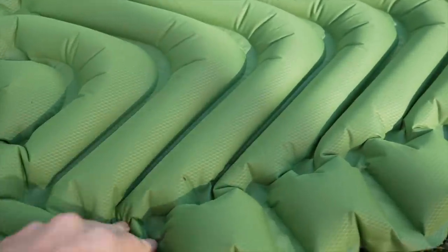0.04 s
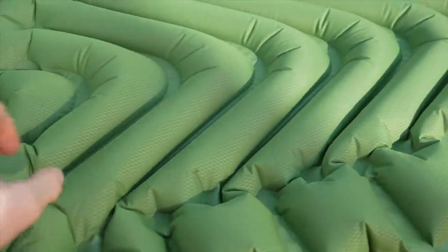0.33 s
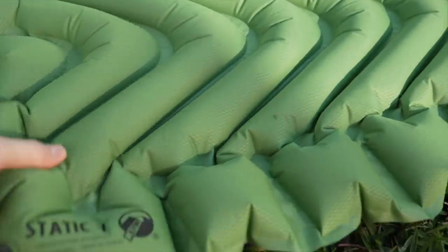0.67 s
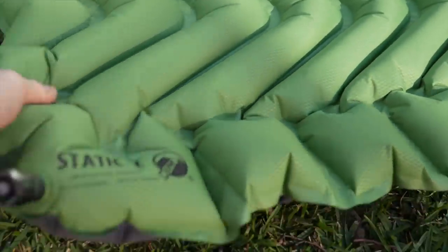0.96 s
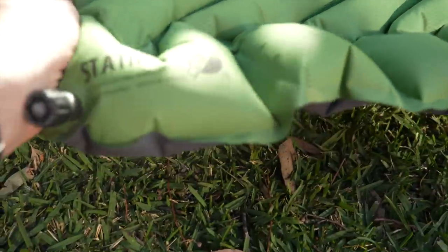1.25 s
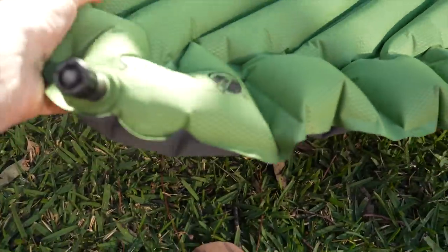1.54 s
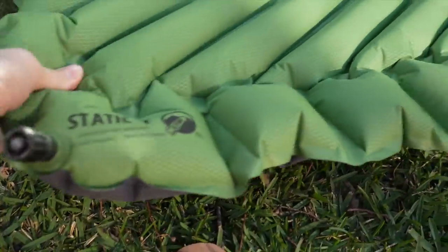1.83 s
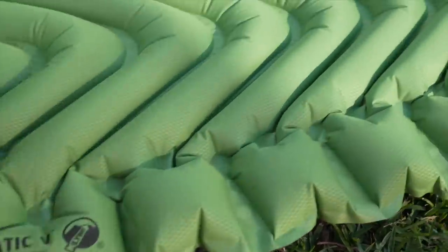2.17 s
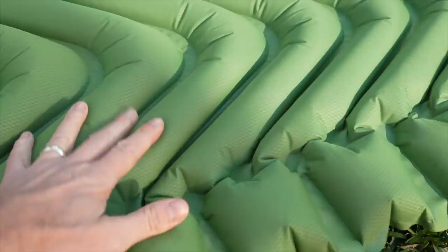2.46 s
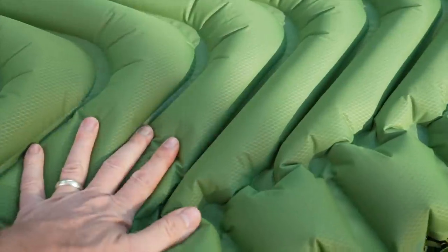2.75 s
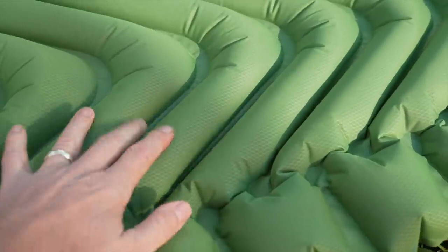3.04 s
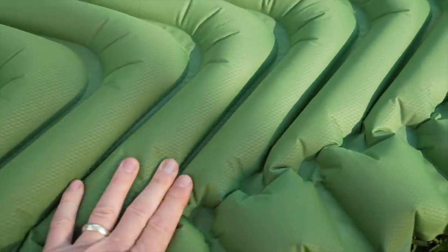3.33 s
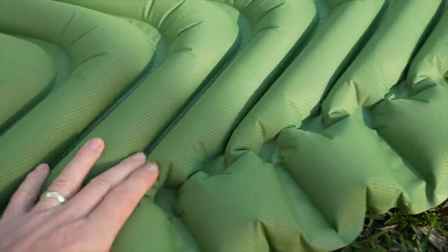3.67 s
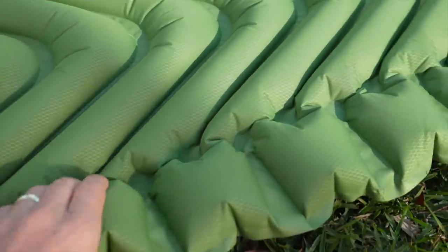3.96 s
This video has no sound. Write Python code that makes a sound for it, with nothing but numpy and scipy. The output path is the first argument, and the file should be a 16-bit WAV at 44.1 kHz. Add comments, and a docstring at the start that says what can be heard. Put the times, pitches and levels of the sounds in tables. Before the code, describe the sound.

A hand rubs an inflated fabric pad close by, making an uneven, slightly hollow rasp with crackles. Creases snap in clusters around 0.2 and 0.8 seconds, and most sharply from 1.1 to 1.5. Louder rubbing swishes come at about 2.1 and 2.5 seconds, the strongest at 3.3. Scattered clicks and a few soft thumps continue until about 4 seconds, with a faint, steady outdoor rumble throughout.

```python
"""Skin rasps and creases crackle close by, as a hand handles an inflated fabric sleeping pad on a lawn:
it grips the pad, lifts a corner, lays it back, then strokes and presses it.
The rasp is thousands of tiny slips over the taut weave; each snap is a patch of fabric buckling.
The air chambers answer with a short hollow ring and soft thumps, over a faint outdoor rumble."""
import sys
import numpy as np
from scipy import signal
from scipy.fft import rfft, irfft
from scipy.io import wavfile

SR = 44100
rng = np.random.default_rng(int(sys.argv[2]) if len(sys.argv) > 2 else 0)


def store_pcm(level_fs):
    """Save levels as 16-bit WAV."""
    pcm = np.round(np.clip(level_fs, -1, 1) * 32767).astype(np.int16)
    wavfile.write(sys.argv[1], SR, np.atleast_2d(pcm).T)


N = 176400
TIME = np.arange(N) / SR


def rubbing(body_db, rasp_db):
    """Sliding skin excites the hollow chambers, the taut fabric and the weave; the uneven grip judders."""
    # Tone of the hollow chambers: (frequency [Hz], relative level [dB])
    body_tone = [(60, -1), (150, -10.5), (260, -6.5), (370, 0), (480, -5.5), (700, -3), (850, -7.5),
                 (1350, -12.5), (2000, -43)]
    # Tone of the taut fabric's rasp: (frequency [Hz], relative level [dB])
    rasp_tone = [(700, -6.5), (1350, 0.5), (2200, -3.5), (3800, -8), (7000, -25)]
    # Tone of the weave's hiss: (frequency [Hz], relative level [dB])
    hiss_tone = [(3000, -24), (5400, -1), (10500, -9), (16000, -14)]
    # Level ride of the hiss against the rasp: (time [s], level [dB])
    sheen = [(0.62, -6), (1.2, -3.5), (2.12, -4), (2.25, -18), (2.4, -7.5), (3.5, -5), (3.8, 1.5),
             (4.0, -4.5)]
    hiss_db = rasp_db + np.interp(TIME, *np.transpose(sheen))
    judder_db = 2 * drift(rate_hz=29)
    layers = (body_tone, body_db), (rasp_tone, rasp_db), (hiss_tone, hiss_db)
    return sum(from_db(db + judder_db) * colour(slips(), tone) for tone, db in layers)


def slips(per_s=8000, spread_db=4.5, smooth_share=0.41):
    """Skin catches and slips on threads: dense grains of uneven size over a smooth hiss."""
    sizes = from_db(spread_db * np.minimum(rng.exponential(1, N), 5)) * rng.choice([-1, 1], N)
    grains = rms_one(sizes * (rng.random(N) < per_s / SR))
    return np.sqrt(1 - smooth_share) * grains + np.sqrt(smooth_share) * rng.standard_normal(N)


def snaps(neighbour_spread_s=0.005, neighbour_db=-14.5):
    """Large creases snap through; each drags two tiny neighbouring folds along, just before or after."""
    # Snap cues: (time [s], strength [dB], pitch of the buckling patch [Hz], crack strength [dB])
    cues = [(0.1522, 12.5, 2630, 2.5), (0.1876, 13, 3450, -5), (0.1957, 14.5, 1740, 3),
            (0.2187, 10, 1500, -5), (0.2298, 12, 1390, -8), (0.2438, 12.5, 1750, 8.5),
            (0.2545, 7, 1690, -13), (0.2803, 8.5, 2060, -17), (0.3177, 17.5, 1440, 4),
            (0.3356, 18, 603, -21), (0.7299, 11.5, 2580, 8), (0.762, 6, 3320, -2), (0.7775, 17, 1700, 6),
            (0.789, 12, 1990, 8.5), (0.8199, 15.5, 3360, 5.5), (0.8226, 5, 3020, 0), (1.012, 8, 1820, -10),
            (1.069, 14.5, 1600, 0), (1.1501, 23, 830, 16.5), (1.1941, 14, 2630, 1), (1.198, 18.5, 585, -3),
            (1.2354, 22.5, 330, -15), (1.2378, 21, 740, -19), (1.2898, 10.5, 1610, -23),
            (1.3808, 23.5, 670, -7), (1.4087, 13, 2070, -18), (1.4222, 14, 920, 1),
            (1.4487, 17, 1510, 14.5), (1.4655, 11, 1400, 1), (1.4775, 12, 3320, -14), (1.4862, 13, 2650, 6),
            (1.4996, 17, 720, -22), (1.767, 7.5, 2200, -14), (1.8038, 13, 746, 5), (1.8105, 16, 2350, 2),
            (1.8266, 13, 3200, 3), (1.906, 12.5, 1560, -0.5), (1.9761, 13.5, 2880, -3),
            (2.0602, 11.5, 1100, -7), (2.083, 9, 2390, 0), (2.112, 15, 990, 7), (2.6068, 16.5, 1370, 1),
            (2.7084, 14, 1570, 5.5), (2.7377, 11.5, 2940, 1.5), (2.7966, 19, 445, 0.5),
            (2.8539, 6, 2200, -6), (2.9697, 16, 2020, 1), (3.0404, 16.5, 1300, 2.5),
            (3.4725, 8.5, 1310, 11.5), (3.4785, 16, 2350, -19), (3.6028, 13.5, 1830, 7),
            (3.6257, 16, 1190, -2), (3.6789, 17, 1820, 9.5), (3.6846, 18, 1630, -1), (3.8715, 20, 1000, 9),
            (3.9589, 1, 3720, -17)]
    out = np.zeros(N)
    for start, db, hz, crack_db in cues:
        add(out, start, crease(db, hz, crack_db))
        for lag in rng.normal(0, neighbour_spread_s, 2):
            fold_hz = hz * 2 ** rng.uniform(-0.47, 0.74)
            add(out, start + lag, crease(db + neighbour_db, fold_hz, crack_db + neighbour_db))
    return out


def crease(db, hz, crack_db):
    """A patch buckles and settles: a sharp crack, two or three cycles at its pitch, a chamber ring."""
    # Tone of the chamber's ring: (frequency [Hz], relative level [dB])
    ring_tone = [(100, -6), (280, 0.5), (600, -3), (8000, -39)]
    crossover_hz, crack_top_hz = 4250, 7400   # the crack takes over where the patch's sound ends
    mean_settle_s, crack_decay_s, ring_decay_s = 0.000911, 0.00061, 0.0054
    size = 2048
    clicks = np.zeros(size)
    clicks[0] = 1
    settle_at = 1 + int(mean_settle_s * SR * (.5 + rng.random()))
    clicks[settle_at] = from_db(-9) * rng.choice([-1, 1])
    resonance = poles(hz, q=1.71)
    band_pass = (1 - resonance[2]) / 2 * np.array([1, 0, -1])
    patch = from_db(db) * signal.lfilter(band_pass, resonance, clicks)
    patch = signal.lfilter(*signal.butter(2, crossover_hz, fs=SR), patch)
    burst = rng.standard_normal(size) * np.exp(-TIME[:size] / crack_decay_s)
    crack_band = signal.butter(1, [crossover_hz, crack_top_hz], "band", fs=SR)
    crack = from_db(crack_db) * signal.lfilter(*crack_band, burst / np.linalg.norm(burst))
    ring = rms_one(colour(rng.standard_normal(size), ring_tone) * np.exp(-TIME[:size] / ring_decay_s))
    return patch + crack + from_db(-3.5) * patch.std() * ring


def crackle(rasp_db, per_s=45, low_hz=640, high_hz=3300, spread_db=4.5):
    """Small creases give way at random, louder as the fabric works harder."""
    out = np.zeros(N)
    for i in np.flatnonzero(rng.random(N) < per_s / SR):
        hz = low_hz * (high_hz / low_hz) ** rng.random()
        db = 24 + 0.81 * rasp_db[i]   # follows most of the rasp's swing
        db += spread_db * min(rng.exponential(), 2)
        add(out, i / SR, crease(db, hz, crack_db=db - 14))
    return out


def thumps():
    """Bumped, pressed or tapped, the air cushion swells and wobbles for a few cycles."""
    # Thump cues: (time [s], envelope peak [dB], pitch [Hz], swell time [s])
    cues = [(0.717, -13.5, 680, 0.0014), (0.819, -23, 70, 0.0058), (0.895, -17.5, 51, 0.011),
            (1.233, -21.5, 147, 0.0026), (2.608, -9.5, 1370, 0.00089), (3.245, -15.5, 34, 0.018),
            (3.4324, -11, 620, 0.00098), (3.868, -20.5, 55, 0.0068)]
    out = np.zeros(N)
    t = TIME[:SR // 2]
    for start, db, hz, swell_s in cues:
        envelope = from_db(db) * t / swell_s * np.exp(1 - t / swell_s)
        add(out, start, envelope * np.sin(2 * np.pi * hz * t))
    return out


def outdoor_air(level_db=-37):
    """Open air lays a faint, steady low rumble under the scene."""
    # Tone of the rumble: (frequency [Hz], relative level [dB])
    rumble_tone = [(14, 12), (38, -5.5), (250, -17), (16000, -95)]
    return from_db(level_db) * colour(rng.standard_normal(N), rumble_tone)


def from_db(db):
    """Decibels to gain."""
    return 10 ** (np.asarray(db) / 20)


def rms_one(x):
    """Scale to rms 1."""
    return x / np.sqrt(np.mean(x ** 2) + 1e-20)


def colour(x, tone):
    """EQ a sound to a tone curve, rolling off below its first point; rms 1."""
    hz, db = np.transpose(tone)
    bin_hz = np.maximum(np.arange(len(x) // 2 + 1) * SR / len(x), 1)
    low_cut = np.minimum(bin_hz / hz[0], 1) ** 2
    eq = from_db(np.interp(np.log(bin_hz), np.log(hz), db))
    return rms_one(irfft(rfft(x) * low_cut * eq, len(x)))


def drift(rate_hz):
    """Smooth random wander; rms 1."""
    low_pass = signal.butter(2, rate_hz, fs=SR, output="sos")
    return rms_one(signal.sosfilt(low_pass, rng.standard_normal(N + SR))[SR:])


def poles(hz, q):
    """Coefficients of a damped resonance."""
    r = np.exp(-np.pi * hz / q / SR)
    return np.array([1, -2 * r * np.cos(2 * np.pi * hz / SR), r * r])


def add(out, start_s, sound):
    """Mix a sound in at a time."""
    i = int(np.clip(start_s * SR, 0, N - 1))
    out[i:i + len(sound)] += sound[:N - i]


def scene():
    """Hand and pad over faint outdoor air, in mono."""
    # Level ride of the sliding hand: (time [s], hollow body level [dB], rasp level [dB])
    strokes = [(0.0, -41, -39.5), (0.09, -42, -48), (0.2, -29.5, -32.5), (0.416, -47.5, -51),
               (0.437, -33, -38.5), (0.62, -33.5, -38.5), (0.789, -28.5, -28), (0.862, -41.5, -46.5),
               (1.01, -32, -35.5), (1.09, -37.5, -45), (1.2, -40, -33), (1.272, -26, -38.5),
               (1.331, -48.5, -55), (1.39, -41, -42.5), (1.5, -36.5, -38), (1.6, -47, -51.5),
               (1.83, -35.5, -44), (2.01, -38.5, -45.5), (2.077, -21.5, -27), (2.126, -28, -31.5),
               (2.2, -41.5, -51), (2.251, -40, -43), (2.273, -51.5, -60), (2.412, -61.5, -67),
               (2.418, -33.5, -44.5), (2.487, -21, -27.5), (2.58, -28, -31.5), (2.73, -30.5, -32.5),
               (2.92, -39.5, -45), (3.049, -33, -34.5), (3.109, -32.5, -38.5), (3.135, -41.5, -47),
               (3.222, -55, -66), (3.226, -44.5, -49), (3.264, -16.5, -20.5), (3.311, -29.5, -33),
               (3.54, -37.5, -39), (3.6, -32.5, -35), (3.867, -32.5, -34), (3.905, -39.5, -45.5),
               (4.0, -40, -40.5)]
    times, *levels = np.transpose(strokes)
    body_db, rasp_db = (np.interp(TIME, times, db) for db in levels)
    air = outdoor_air()
    return (rubbing(body_db, rasp_db) + snaps() + crackle(rasp_db) + thumps() + air)[None]


def record(dry, ceiling=0.83, cutoff_hz=16000):
    """The microphone port rings and dulls the treble; the highest peaks are rounded and the top is cut."""
    dip, peak = poles(hz=4600, q=2.09), poles(hz=3707, q=4.6)
    ported = signal.lfilter(dip / dip.sum(), peak / peak.sum(), dry)
    rounded = ported / (1 + (ported / ceiling) ** 6) ** (1 / 6)
    return signal.sosfilt(signal.ellip(10, .2, 80, cutoff_hz, fs=SR, output="sos"), rounded)


dry = scene()
out = record(dry)
store_pcm(out)
```